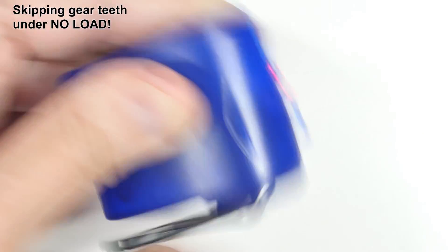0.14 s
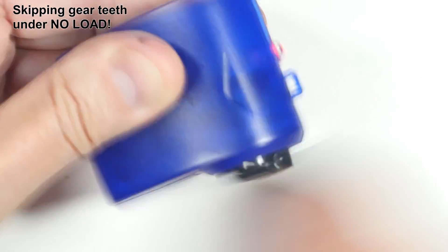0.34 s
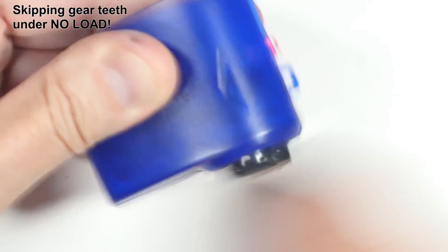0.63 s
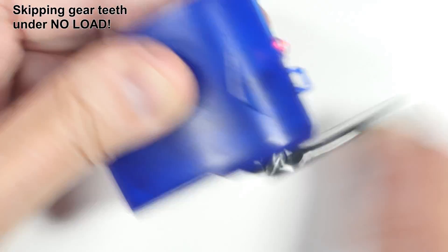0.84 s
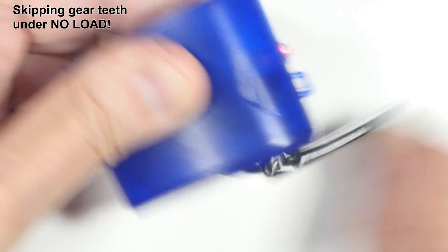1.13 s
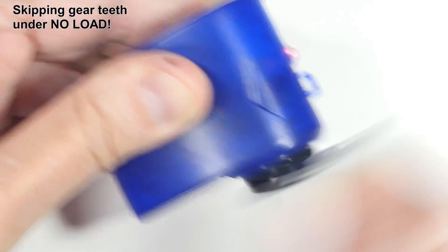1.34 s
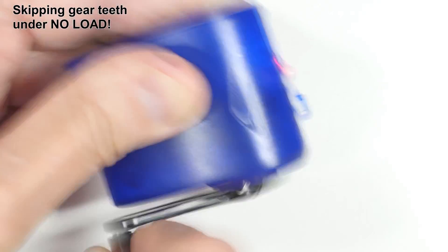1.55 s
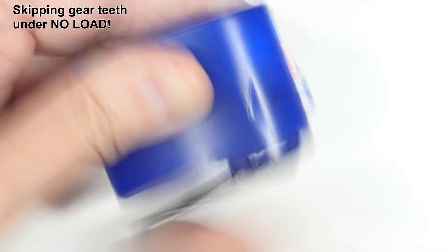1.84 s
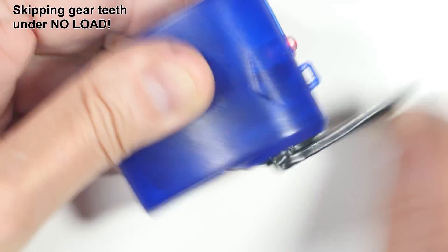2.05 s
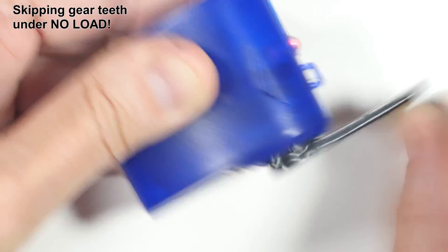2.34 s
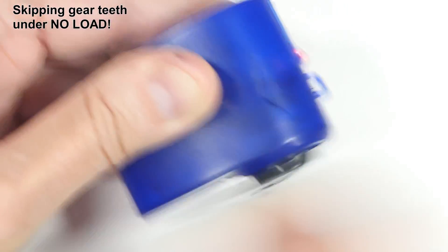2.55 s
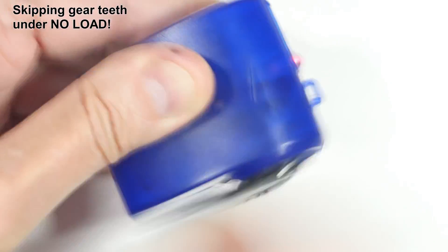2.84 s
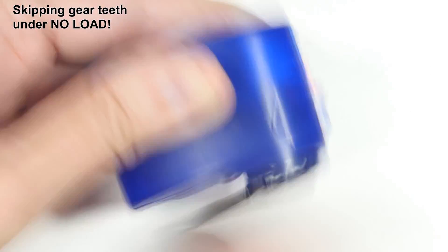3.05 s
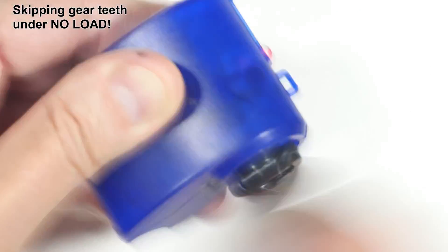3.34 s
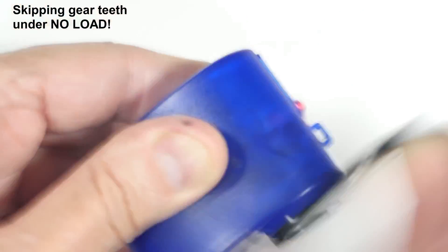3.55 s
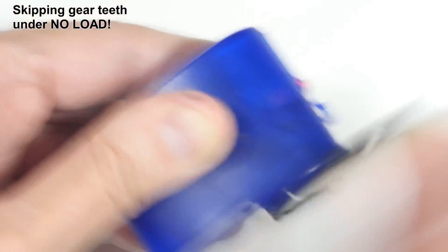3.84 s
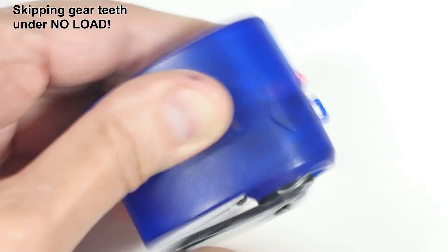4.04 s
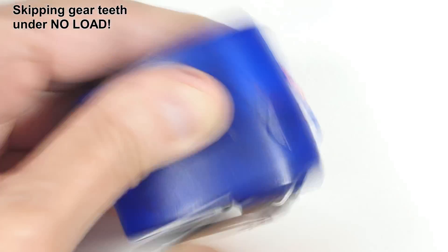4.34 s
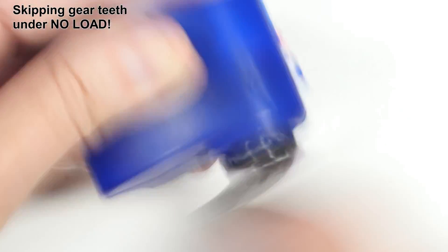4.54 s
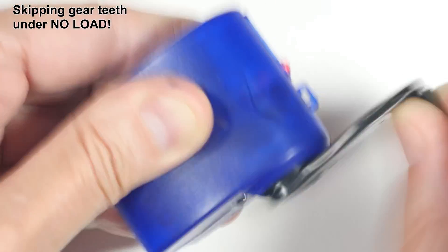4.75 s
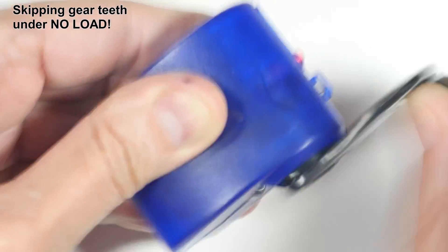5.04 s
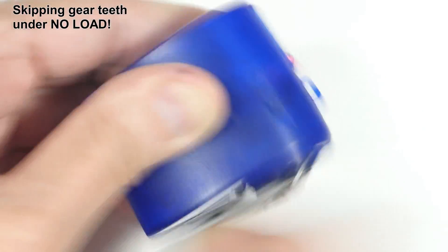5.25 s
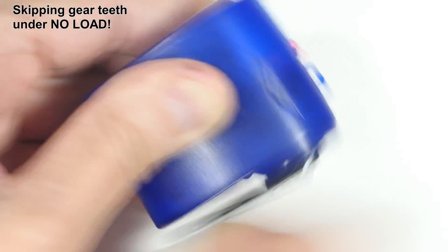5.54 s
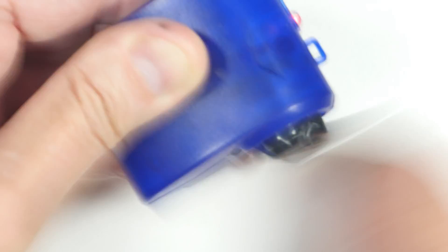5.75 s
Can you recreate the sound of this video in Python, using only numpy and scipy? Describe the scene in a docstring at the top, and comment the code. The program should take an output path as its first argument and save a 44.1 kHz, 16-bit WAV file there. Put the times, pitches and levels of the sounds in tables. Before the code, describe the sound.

Fast cranking of a little geared generator: raspy plastic whirr surging several times a second, broken by hard clacks of jumping teeth.

```python
"""A small plastic hand-crank generator, turning from the first instant, close by at about three turns a second.
About twice a turn a push loads three gear meshes: their impacts rattle the hollow case and the whine climbs.
Almost once a turn a jumping tooth gives a sharp snap, made of a resonant knock and a burst of noise.
Friction of the case in the hand is heard at the start, near 1.6 s and near the end, as short booming noise.
Short reflections follow every sound, and a faint, mostly low room noise lasts throughout."""
import sys
import numpy as np
from scipy import signal
from scipy.fft import rfft, irfft
from scipy.io import wavfile
from scipy.ndimage import uniform_filter1d, minimum_filter1d

SR = 44100
rng = np.random.default_rng(int(sys.argv[2]) if len(sys.argv) > 2 else 0)


def log_audio(samples):
    """Write samples as a 16-bit WAV file to the path given in sys.argv[1]."""
    # one column per channel
    frames = np.atleast_2d(samples).T
    # limit to full scale, then quantise
    limited = np.clip(frames, -1, 1)
    pcm = np.round(limited * 32767).astype(np.int16)
    wavfile.write(sys.argv[1], SR, pcm)


N = 259512
TIME = np.arange(N) / SR

# Source levels and lifts are relative: later gains scale them.
# pushes of the hand, a long one and often a short one each turn; a firm bite sings more and rattles less:
# (start t/s, length t/s, level/dB, rotor speed at the start f/Hz, speed reached f/Hz, bite level/dB,
#  low shaking of the case level/dB, hard edge level/dB)
PUSHES = [(-.028, 0.049, -30, 232.4, 272.6, -4, 0.5, -7), (.173, 0.16, -32.5, 189, 234, 3.5, 2, 2.5),
          (0.338, 0.049, -35, 223, 268.2, 7, 0.5, 8.5), (0.477, 0.19, -30.5, 199, 257, -3.5, 0, 1),
          (0.661, 0.051, -27, 235.5, 277, -4.5, 3.5, -1.5),
          (0.774, 0.17, -30.5, 210.7, 251.1, -5.5, 0.5, 0), (0.952, 0.058, -28, 245.6, 273.2, 0, 4.5, 5),
          (1.072, 0.17, -30.5, 182.9, 242.9, -5, -0.5, 1), (1.375, 0.097, -30, 184.5, 245.5, -3.5, -2, 1.5),
          (1.495, 0.04, -35, 192.1, 224.4, 4, -2.5, 5), (1.668, 0.12, -32, 170.6, 225, -0.5, 1, 0.5),
          (1.792, 0.1079, -36, 191, 241.8, 1, 6, 3.5), (1.989, 0.15, -31, 183.9, 250, -2, 0, 0.5),
          (2.296, 0.12, -31, 185.3, 264.9, -2, 0.5, 3), (2.423, 0.063, -33.5, 200, 245.7, -2, -2, 3),
          (2.592, 0.099, -30.5, 187.8, 260, -3.5, 0, 3), (2.712, 0.074, -34, 184.2, 228.3, -3.5, -1.5, 1),
          (2.901, 0.12, -29.5, 203.7, 268.4, -2, -0.5, 2.5), (3.032, 0.054, -33.5, 197, 234.7, 5.5, -9, 2),
          (3.203, 0.094, -31, 194.8, 258.5, 4, -3, 2), (3.38, 0.091, -34, 192.2, 239.5, 0, 2, 2),
          (3.517, 0.12, -32.5, 199.4, 255.9, -1.5, -3.5, -1), (3.693, 0.045, -33, 185.1, 231, 4.5, -12, -1),
          (3.846, 0.11, -29.5, 210.8, 277.8, -1.5, 0, -1), (3.977, 0.076, -32.5, 214.3, 266, 3, -1, 1),
          (4.139, 0.089, -29, 228.7, 271.7, -1.5, -2.5, -3), (4.26, 0.052, -36, 205, 244.5, -4, -1, -2),
          (4.43, 0.082, -30.5, 205.6, 282.1, -2, -1, -0.5),
          (4.572, 0.0665, -33.5, 168.7, 261.2, 5.5, -2, 3.5),
          (4.697, 0.18, -34, 186.1, 234.5, -7, -1.5, -3.5),
          (5.042, 0.082, -29, 204.5, 263.5, -6, -3.5, -3.5), (5.172, 0.054, -34, 182.8, 234.4, 2, 4.5, 0.5),
          (5.312, 0.11, -30, 200.2, 266.2, -3, -2.5, -0.5),
          (5.44, 0.073, -34, 206.7, 249.4, -7, -1.5, -3.5),
          (5.622, 0.1, -27.5, 210.7, 259.3, -1.5, -3, -2.5), (5.752, 0.11, -31.5, 236.2, 291.7, 2, 0, 2.5)]
ATTACK_S, RELEASE_S = 0.033, 0.053  # the load on the teeth comes and goes
OVERRUN_S = .012  # the rotor gains a little longer than the hand pushes
COAST_DB = -35.5  # teeth rattling freely between pushes
# a brief lull after each push while the backlash is crossed
EASE_DB, EASE_HALF_WIDTH_S, EASE_LAG_S = 4.5, 0.02, 0.062
# brief stalls of the hand: (t/s, dip level/dB; a negative dip is a rise)
STALLS = [(.075, 8), (.485, -1.5), (.765, -0.5), (1.07, 2), (1.562, 5), (1.598, 5.5), (2.195, 3),
          (3.355, 5.5), (3.8, 2), (4.585, 0), (4.685, 5.5), (5.175, 2.5), (5.285, 4.5), (5.6, 1)]
STALL_S = 0.018
# whine of the pinion; uneven teeth add other orders: (multiple of the rotor speed, level/dB)
WHINE_ORDERS = [(3, -11.5), (4, -6.5), (5, 1.5), (7, 0.5), (8, 0), (9, 0), (11, 2.5), (12, 1), (13, -1.5)]
# passage of the whine through the case: (f/Hz, level/dB)
WHINE_COLOUR = [(500, -10.5), (900, 0), (1200, 2), (1450, -7), (1700, 2), (2300, 0), (2700, 0), (3200, -3),
                (4000, 3), (6500, 2)]
# rough bands round the meshing rates: (multiple of the rotor speed, width f/Hz, level/dB)
GRIND_BANDS = [(7.545, 300, -2), (24.3, 1300, -5.5)]
# resonances of the case and gears: (f/Hz, width f/Hz, lift level/dB)
CASE_MODES = [(261, 9.7, 7.5), (462, 54, 3.5), (550, 32, -1.5), (728, 9.3, 5.5), (812.1, 21, 9.5),
              (906, 41.8, 4.5), (989, 17.4, 11), (1096, 23, 5.5), (1126, 30, 8), (1312, 86, 8),
              (1680, 97, 2.5), (2473, 256, 6), (2670, 170, -11.5), (3000, 48, 1.5), (3580, 140, -4),
              (3765, 36, 7), (4170, 113, -26), (5530, 630, -6.5), (6160, 570, 3)]
# spectra of the deep case shaking, tooth rattle, single hard contacts and sliding: (f/Hz, level/dB)
DEEP_COLOUR = [(100, -27.5), (350, -27.5), (500, -18), (660, -11), (800, -1), (1000, 0), (1250, -3.5),
               (1450, -21), (1800, -27), (4000, -35.5)]
RATTLE_COLOUR = [(300, -54), (900, -28), (1450, -8.5), (1650, 2.5), (2000, 1), (2600, -3), (3300, 0),
                 (4000, -2), (5000, -6), (6300, -11.5), (7500, -15.5), (9500, -20), (16000, -35.5)]
GRIT_COLOUR = [(300, -46), (600, -23.5), (950, -1), (1450, -3), (2000, 4), (3500, -3), (5000, -4.5),
               (7000, -14.5), (9000, -17), (12000, -20), (16000, -36)]
HISS_COLOUR = [(2000, -17.5), (6000, -27), (8000, 7), (9500, 1), (12000, 5), (14500, 2.5), (15700, 3),
               (16300, -26)]
# transmission of the highs as the fingers shift: (t/s, level near 4 kHz level/dB, treble level/dB)
HIGHS = [(0, 2, 1), (.45, 5.5, -4), (.7, 1, 0.5), (1.25, 3.5, -3), (1.7, 0.5, -0.5), (3.2, 1.5, -1),
         (4.2, -3.5, 3), (5.88, 4.5, -0.5)]
RIDGE_HZ, RIDGE_WIDTH_HZ = 3880, 320
# upward squeals of the biting pinion: (start t/s, length t/s, from f/Hz, to f/Hz, level/dB)
SQUEALS = [(.21, 0.14, 2380, 2950, -46), (.364, 0.0218, 2850, 3080, -30), (0.499, 0.034, 2300, 2650, -35),
           (0.577, 0.058, 3800, 4040, -39), (.96, 0.056, 3800, 4010, -41), (1.09, 0.043, 2200, 2539, -34.5),
           (1.214, 0.049, 2650, 3086, -41), (1.684, .06, 2130, 2650, -36.5),
           (1.817, 0.063, 2400, 2870, -38), (1.998, 0.07, 2200, 2623, -36), (2.319, 0.049, 2300, 2812, -35),
           (4.45, 0.046, 2600, 3047, -29), (4.594, .045, 2150, 2808, -37), (5.201, 0.038, 2200, 2692, -41)]
SQUEAL_ATTACK_S, SQUEAL_RELEASE_S = .012, 0.022
# tooth jumps, their rebounds and lesser slips under load: (t/s, knock level/dB, crack level/dB,
#  knock resonance f/Hz, lift of its low thump level/dB, gears catching again level/dB)
SKIPS = [(0.099, -19.5, -24.5, 1850, -7.5, -50.5), (0.107, -30.5, -26, 1980, 3, -35.5),
         (0.3989, -32, -30, 1600, 0, -40), (0.4042, -19.5, -23, 1550, 0, -33.5),
         (.7003, -30, -29, 2200, 0, -55), (0.7067, -33, -30, 2414, -2, -55),
         (0.731, -26, -33, 3700, -11, -55), (.888, -28, -39, 2200, -2, -51),
         (1.2782, -23.5, -24, 1804, 0.5, -33.5), (1.29, -32, -38, 897.9, -2, -34.5),
         (1.4367, -34, -32, 1782, -7, -55), (1.4574, -22, -30, 1746, -9, -55),
         (1.4758, -25.5, -33, 1750, -5, -55), (1.5745, -23, -23, 1894, -4, -53),
         (1.5816, -32, -27, 1997, -5, -31.5), (1.8964, -23.5, -22, 1116, -1, -33),
         (1.9334, -26, -36, 2399, -10, -55), (2.2122, -24.5, -18.5, 2633, -4, -33.5),
         (2.2154, -29, -28, 998, -2, -40), (2.5136, -21.5, -18.5, 4360, -5.5, -36),
         (2.8245, -25, -22.5, 1156, -4, -35), (3.1202, -22, -24.5, 1850, -2, -32.5),
         (3.771, -27.5, -20, 1755, 2, -36), (3.9566, -27, -32, 2204, -2, -55),
         (4.071, -18, -17, 1896, -2.5, -31), (4.1785, -34, -42, 2393, -7, -55),
         (4.3538, -22, -14.5, 1900, 2.5, -32), (4.655, -20.5, -13, 1857, 0.5, -42),
         (4.96, -22, -19.5, 1506, -2, -30), (5.2537, -23.5, -23, 1793, 0, -34.5),
         (5.551, -20, -23, 2103, -3, -33), (5.6741, -33, -42, 2410, -7, -68)]
# spectra of the knock and the crack: (f/Hz, level/dB)
KNOCK_COLOUR = [(60, -37), (250, -23.5), (450, -9), (750, 7), (1300, -3.5), (2200, 1.5), (4000, -3.5),
                (7000, -14), (16000, -54)]
CRACK_COLOUR = [(300, -66), (1000, -1), (2000, -4.5), (4000, -1.5), (6000, -6), (8000, -11.5), (9500, -9.5),
                (12000, 0), (15000, -4), (16500, -18)]
THUMP_HZ, THUMP_WIDTH_HZ = 725, 700
# free mesh quietens as a tooth rides up, just ahead of its jump
SLACK_DB, SLACK_S, SLACK_LEAD_S = 7, 0.036, 0.0041
CATCH_ATTACK_S, CATCH_LENGTH_S, CATCH_RELEASE_S = 0.032, 0.041, 0.049  # the gears grab again
# the case shifting in the hand: (start t/s, length t/s, level/dB, boom f/Hz)
RUBS = [(-.015, 0.043, -46, 580), (0.133, 0.037, -62, 113), (1.594, 0.0089, -54, 210.1),
        (1.622, 0.012, -51, 280.6), (1.66, .03, -60, 69.9), (1.7, 0.039, -60.5, 479.7),
        (5.788, 0.0091, -56, 238), (5.817, .012, -54, 290)]
# spectrum of the rubbing: (f/Hz, level/dB)
RUB_COLOUR = [(30, -28), (70, -7), (120, -3), (170, -10), (270, -6.5), (550, -7.5), (900, -1.5),
              (3000, -30)]
RUB_ATTACK_S, RUB_FADE_S = 0.0024, 0.023
BOOM_DB, BOOM_WIDTH = 10.5, 0.35  # width as a share of the boom's pitch
# spectrum of the room noise: (f/Hz, level/dB)
ROOM_COLOUR = [(20, 5.5), (70, 0), (100, -0.5), (150, -7), (215, 2.5), (330, -6), (1000, -27), (16000, -45)]
ROOM_DB = -67
TOP_HZ = 16300


def gears(pinion_count=12, deep_db=-2.0, deep_pressed_db=-5.0, deep_bite=-0.13, deep_speed=1.0,
          unsteady_db=0.43, grit_db=-6.5, grit_pressed_db=2):
    """Impact excitation: loose teeth of three meshes strike the case and slide, while the loaded pinion whines."""
    rotor_hz, rattle_db, pressed, bite_db, shake_db, edge_db = crank()
    rattle_db = rattle_db + unsteady_db * walk(40)
    speed_db = 20 * np.log10(rotor_hz / np.mean(rotor_hz))
    turns = 2 * np.pi * np.cumsum(rotor_hz) / SR
    fast = teeth(rotor_hz * pinion_count, scatter_db=3.0, slop=0.4284)
    middle = teeth(rotor_hz * 4.4, scatter_db=3.0, slop=0.2256)
    slow = teeth(rotor_hz * .8, scatter_db=3, slop=.25)
    # the rotor runs off centre and the slow wheel jolts, so the load throbs unevenly
    eccentric = undb(0.97 * np.sin(turns) + 1.16 * walk(180))
    throb = unit(eccentric * (1 + 0.56 * jolts(rotor_hz / 5.6)))
    blows = (fast + undb(-2) * middle + undb(-6.5) * slow) * throb
    squeeze = np.clip(0.3 * speed_db + .5 * walk(14), -1, 1)

    rattle = case(blows, RATTLE_COLOUR, squeeze) * undb(-2.1 * pressed - 0.25 * bite_db)
    # quick, free teeth strike with a harder edge than slow, pressed ones
    hardness_db = edge_db + 0.21 * speed_db - 0.3 * (pressed - .5)
    hardness_db = hardness_db - 0.36 * (rattle_db - np.mean(rattle_db)) + 2.07 * walk(40)
    rattle = brighten(rattle, hardness_db)

    # teeth floating fast in their backlash shake the whole case
    deep_gain_db = deep_db + shake_db + deep_pressed_db * pressed + deep_bite * bite_db
    deep_gain_db = deep_gain_db + deep_speed * speed_db + 1.44 * walk(24.954)
    deep = case(blows, DEEP_COLOUR, squeeze) * undb(deep_gain_db)

    singing = whine(rotor_hz, pressed) * undb(0.43 * bite_db - 4.5)
    singing = singing + mesh(rotor_hz, pressed, bite_db, edge_db, pinion_count) * throb

    # now and then a tooth lands square and clicks on its own
    clicks = teeth(rotor_hz * 1.8, scatter_db=3.5, slop=0.3006)
    grit = case(clicks, GRIT_COLOUR, squeeze) * undb(grit_db + grit_pressed_db * (pressed - 1))

    # sliding noise follows speed more than force
    hiss_db = -39 + 0.28 * rattle_db + 0.68 * speed_db
    sliding = blows + undb(-4) * slow + undb(-1.0) * noise() * throb
    hiss = unit(colour(sliding * undb(3.16 * walk(45)), HISS_COLOUR)) * undb(hiss_db)
    body = fingers(rattle + deep + singing + grit) * undb(rattle_db - 1.16)
    return body + brighten(hiss, 2.44 * walk(56), edge_hz=7900)


def crank():
    """Driven rotation: each push sets rotor speed, tooth level, flank pressure and firmness of bite."""
    start, length, push_db, from_hz, top_hz, bite_db, shake_db, edge_db = np.transpose(PUSHES)
    # the rotor spins up through each push and runs down until the next
    corners = np.maximum.accumulate(np.c_[start, start + length + OVERRUN_S].ravel())
    rotor_hz = np.interp(TIME, corners, np.c_[from_hz, top_hz].ravel())
    rotor_hz = uniform_filter1d(rotor_hz, size=900)
    load, pressed, bite, catch, slack, ease, shake, edge = (np.zeros(N) for _ in range(8))
    for s, length_s, db, firm_db, low_db, high_db in zip(start, length, push_db, bite_db, shake_db, edge_db):
        push = swell(s, length_s, ATTACK_S, RELEASE_S)
        load = np.maximum(load, push * undb(db))
        pressed = np.maximum(pressed, push)
        bite += push * firm_db
        shake += push * low_db
        edge += push * high_db
        from_lull = (TIME - s - length_s - EASE_LAG_S) / EASE_HALF_WIDTH_S
        ease += np.maximum(1 - from_lull ** 2, 0) ** 2
    for s, *_, catch_db in SKIPS:
        grab = swell(s, CATCH_LENGTH_S, CATCH_ATTACK_S, CATCH_RELEASE_S)
        catch = np.maximum(catch, undb(catch_db) * grab)
        slack = np.maximum(slack, bell(s - SLACK_LEAD_S, SLACK_S))
    coast = undb(COAST_DB - SLACK_DB * slack - EASE_DB * ease)
    level_db = 10 * np.log10(load ** 2 + catch ** 2 + coast ** 2)
    stall_db = sum(db * bell(s, STALL_S) for s, db in STALLS)
    return rotor_hz, level_db - stall_db, pressed, bite, shake, edge


def teeth(hz, scatter_db, slop):
    """Backlash: one impact a tooth, early or late by a share of the pitch, and of uneven size."""
    turned = np.cumsum(hz) / SR
    chance = rng.standard_normal((int(turned[-1]), 2))
    moment = np.arange(len(chance)) + slop * chance[:, 0]
    at = np.interp(moment, turned, np.arange(N) * (N - 2) / N)
    i = at.astype(int)
    size = undb(scatter_db * np.clip(chance[:, 1], -2, 2)) / np.sqrt(hz[i])
    # each impact is shared between its two neighbouring samples
    hits = np.bincount(i, size * (1 - at + i), N) + np.bincount(i + 1, size * (at - i), N)
    return unit(hits - uniform_filter1d(hits, size=256))


def jolts(hz, size_db=4, ring_s=0.0016, slop=0.25):
    """Binding and release: the slow wheel gives short decaying bursts of uneven size and spacing."""
    turned = np.cumsum(hz) / SR
    chance = rng.standard_normal((int(turned[-1]), 2))
    moment = np.arange(len(chance)) + slop * chance[:, 0]
    at = np.interp(moment, turned, np.arange(N)).astype(int)
    kicks = np.bincount(at, undb(size_db * np.clip(chance[:, 1], -2, 2)), N)
    bursts = signal.lfilter([1], [1, -np.exp(-1 / (ring_s * SR))], kicks)
    return uniform_filter1d(bursts, size=40)


def case(x, points, squeeze, shift=0.0338):
    """Modal resonance: the case rings a little higher when squeezed and lower when let go."""
    def ring(ratio):
        """Modal scaling: multiply every resonant frequency by one ratio."""
        return colour(x, points, [(hz * ratio, width, db) for hz, width, db in CASE_MODES])
    slack, tight = ring(1 - shift), ring(1 + shift)
    neutral = colour(x, points, CASE_MODES) * (1 - np.abs(squeeze))
    return unit(neutral + tight * np.maximum(squeeze, 0) + slack * np.maximum(-squeeze, 0))


def whine(rotor_hz, pressed, tone_db=-1, grind_db=-10):
    """Periodicity of rotation: multiples of rotor speed form thin tones, and a shuddering shaft rough bands."""
    phase = 2 * np.pi * np.cumsum(rotor_hz) / SR + 0.056 * walk(260)
    tones = np.zeros(N)
    for order, db in WHINE_ORDERS:
        tones += undb(db + 4.4 * walk(45)) * np.sin(order * phase + 0.75 * walk(150))
    grind = sum(undb(db) * rough(order * phase, width) for order, width, db in GRIND_BANDS)
    sound = undb(tone_db) * unit(colour(tones, WHINE_COLOUR)) + undb(grind_db) * unit(grind)
    return sound * (0.223 + pressed)


def mesh(rotor_hz, pressed, bite_db, edge_db, pinion_count, mesh_db=-13, mesh_bite=1.0, width_hz=260,
         clean=0.4, upper_db=-17, upper_ratio=16.2, upper_width_hz=600):
    """Meshing rate: a rough tone follows rotor speed and bite; a higher one grows with hard-edged pushes."""
    phase = 2 * np.pi * np.cumsum(rotor_hz) / SR
    main = unit(rough(phase * pinion_count, width_hz) + clean * np.sin(phase * pinion_count))
    main = main * undb(mesh_db + mesh_bite * bite_db)
    upper = rough(phase * upper_ratio, upper_width_hz) * undb(upper_db + edge_db - .5 * bite_db)
    return pressed * (main + upper)


def fingers(x):
    """Variable transmission: the grip changes the highs slowly."""
    s, ridge_db, treble_db = np.transpose(HIGHS)
    ridge_gain = undb(np.interp(TIME, s, ridge_db))
    x = x + (ridge_gain - 1) * band(x, RIDGE_HZ, RIDGE_WIDTH_HZ)
    return brighten(x, np.interp(TIME, s, treble_db), edge_hz=2560)


def squeals(squeal_db=-1, width_hz=260, clean=.7, waver=.011, flutter_db=1.5):
    """Frictional singing: dry flanks bite and sound a rough, wavering band that climbs with the gears' speed."""
    out = np.zeros(N)
    wobble = 1 + waver * walk(160)
    shudder = clean + walk(width_hz) + 1j * walk(width_hz)
    for s, length_s, from_hz, to_hz, db in SQUEALS:
        on = (TIME > s) & (TIME < s + length_s + SQUEAL_RELEASE_S)
        hz = (from_hz + (to_hz - from_hz) * (TIME[on] - s) / length_s) * wobble[on]
        tone = np.real(shudder[on] * np.exp(2j * np.pi * np.cumsum(hz) / SR))
        gain = swell(s, length_s, SQUEAL_ATTACK_S, SQUEAL_RELEASE_S)[on]
        out[on] += undb(db) * unit(tone) * gain
    return out * undb(squeal_db + flutter_db * walk(400))


def skips(knock_db=12, crack_db=5.0, crack_s=0.0018, rise_s=0.00015, chatter_s=0.00084, chatter=0.26,
          ring_db=7, ring_width=0.29, size=1024):
    """Impulse response: a jumping tooth slams and chatters once; its edge cracks across the flank."""
    t = np.arange(size) / SR
    knocks, cracks = np.zeros(2 * N), np.zeros(2 * N)
    scrape = np.exp(-t / crack_s) * (1 - np.exp(-t / rise_s))
    for s, body_db, edge_db, ring_hz, thump_db, _ in SKIPS:
        i = int(s * SR)
        slam = np.zeros(size)
        rebound = int(chatter_s * rng.uniform(.7, 1.3) * SR)
        slam[[0, rebound]] = 1, chatter
        slam = slam + (undb(thump_db) - 1) * band(slam, THUMP_HZ, THUMP_WIDTH_HZ)
        slam = slam + (undb(ring_db) - 1) * band(slam, ring_hz, ring_width * ring_hz)
        knocks[i:i + size] -= undb(body_db + knock_db) * slam
        cracks[i:i + size] += undb(edge_db + crack_db) * scrape * rng.standard_normal(size)
    knock = undb(11.0) * colour(knocks[:N], KNOCK_COLOUR, CASE_MODES)
    return knock + undb(1.0) * colour(cracks[:N], CRACK_COLOUR)


def judder(judder_db=-47, judder_s=0.037, rate_hz=170, hollow_hz=500, hollow_width_hz=260, hard_db=-18,
           steepness=3):
    """Forced resonance: the loose gear train faintly shakes the hollow case, most after the hardest jumps."""
    shake = np.zeros(N)
    for s, db, _, _, thump_db, _ in SKIPS:
        strength = undb(steepness * min(db + thump_db - hard_db, 0))
        shake += strength * swell(s, 0, CATCH_ATTACK_S / 2, 2 * judder_s)
    blows = teeth(np.full(N, rate_hz), scatter_db=5.5, slop=0.405)
    hollow = band(band(blows, hollow_hz, hollow_width_hz), hollow_hz, hollow_width_hz)
    return undb(judder_db) * shake * unit(hollow)


def grip():
    """Dry friction: skin sticks and slips on the case with a dull rustle; the cupped hand booms."""
    out = np.zeros(N)
    for s, length_s, db, boom_hz in RUBS:
        fade = np.exp(-np.clip((TIME - s - length_s) / RUB_FADE_S, 0, 20))
        gain = np.clip((TIME - s) / RUB_ATTACK_S, 0, 1) * fade
        boom = [(boom_hz, BOOM_WIDTH * boom_hz, BOOM_DB)]
        rustle = unit(colour(noise() * undb(2.6 * walk(60)), RUB_COLOUR, boom))
        out += undb(db + 8.0) * gain * rustle
    return out


def reflections(x, wet_db=-16, t60_s=0.57, size=8192):
    """Reverberation: the table top and a small room answer with a short, decaying, dulled tail."""
    t = np.arange(size) / SR
    tail = rng.standard_normal(size) * undb(-60 * t / t60_s) * (t > .003)
    tail = signal.lfilter(*signal.butter(1, 4000, fs=SR), tail)
    return undb(wet_db) * signal.fftconvolve(x, tail / np.linalg.norm(tail))[:N]


def room_noise():
    """Stationary background: filtered noise at a constant level."""
    return undb(ROOM_DB) * unit(colour(noise(), ROOM_COLOUR))


def rough(phase, width_hz):
    """Random modulation: broadens a tone into a narrow, shuddering band."""
    return walk(width_hz) * np.sin(phase) + walk(width_hz) * np.cos(phase)


def colour(x, points, modes=(), size=8192):
    """Minimum-phase filtering: a broad causal spectrum with resonances on top."""
    f = np.arange(size // 2 + 1) * SR / size + 1e-3
    hz, db = np.transpose(points)
    cepstrum = irfft(np.log(undb(np.interp(np.log(f), np.log(hz), db))))
    # folding the cepstrum forward makes the response causal
    cepstrum[1:size // 2] *= 2
    cepstrum[size // 2 + 1:] = 0
    response = np.exp(rfft(cepstrum))
    for centre, width, lift_db in modes:
        response *= 1 + (undb(lift_db) - 1) / (1 + 1j * (f * f - centre * centre) / (f * width))
    return signal.fftconvolve(x, irfft(response))[:N]


def brighten(x, lift_db, edge_hz=3400):
    """High-band gain: a moving treble shelf."""
    high_pass = signal.butter(3, edge_hz, "high", fs=SR, output="sos")
    return x + signal.sosfiltfilt(high_pass, x) * (undb(lift_db) - 1)


def band(x, hz, width_hz):
    """Simple resonance: gain one at the centre."""
    return signal.lfilter(*signal.iirpeak(hz, hz / width_hz, fs=SR), x)


def swell(start_s, length_s, attack_s, release_s):
    """Linear envelope: rise, hold until the length is over, release."""
    t = TIME - start_s
    return np.clip(np.minimum(t / attack_s, 1 - (t - length_s) / release_s), 0, 1)


def bell(centre_s, width_s):
    """Gaussian envelope: a smooth bump of height one."""
    return np.exp(-np.minimum(((TIME - centre_s) / width_s) ** 2, 20))


def walk(rate_hz):
    """Random fluctuation: interpolated noise values with a spread near one."""
    return 1.2 * np.interp(TIME * rate_hz, np.arange(N), noise())


def noise():
    """White noise: equal power at all frequencies."""
    return rng.standard_normal(N)


def undb(db):
    """Logarithmic level: decibels to amplitude gain."""
    return 10 ** (np.asarray(db) / 20)


def unit(x):
    """Normalization: scale to an rms of one."""
    return x / np.sqrt(np.mean(x ** 2))


def scene():
    """Superposition: generator, its reflections and the quiet room add."""
    generator = gears() + squeals() + skips() + judder() + grip()
    return (generator + reflections(generator) + room_noise())[None]


def record(dry, ceiling=.275):
    """Peak limiting and band limiting: a fast limiter holds the snaps down, and the top is cut."""
    gain = ceiling / np.maximum(np.abs(dry), ceiling)
    gain = minimum_filter1d(gain, size=45)  # the gain dips a millisecond round each peak
    limited = dry * uniform_filter1d(gain, size=45)
    return signal.sosfilt(signal.ellip(8, .2, 70, TOP_HZ, fs=SR, output="sos"), limited)


dry = scene()
out = record(dry)
log_audio(out)
```